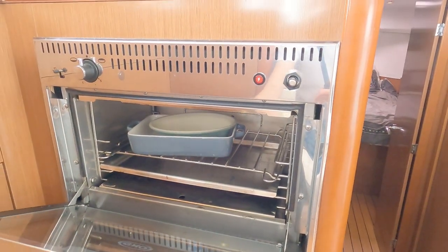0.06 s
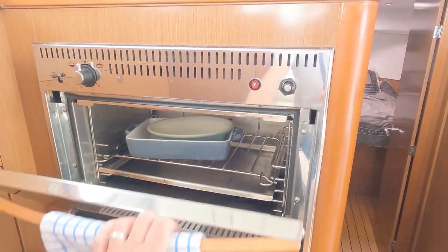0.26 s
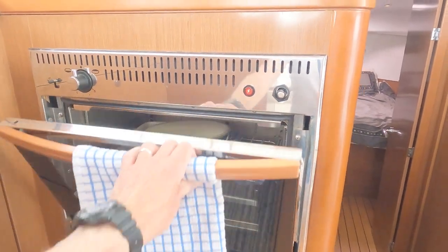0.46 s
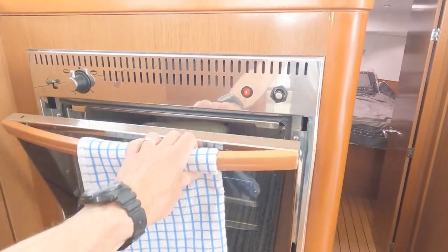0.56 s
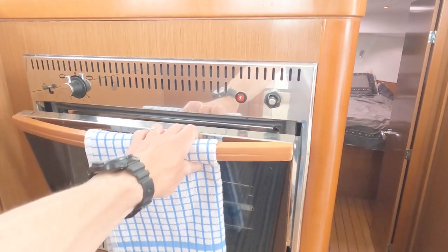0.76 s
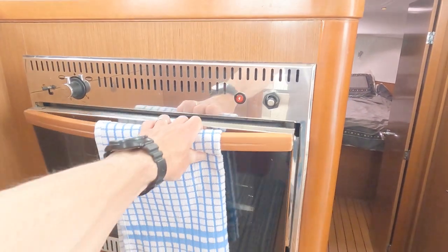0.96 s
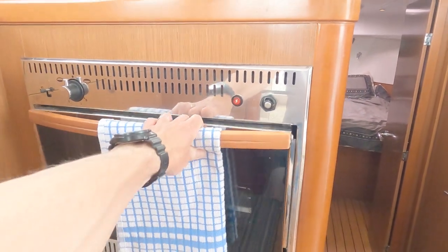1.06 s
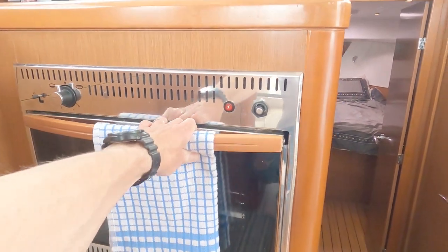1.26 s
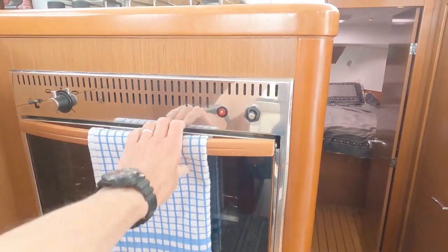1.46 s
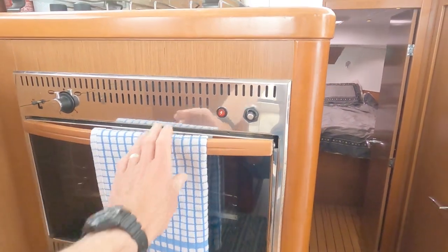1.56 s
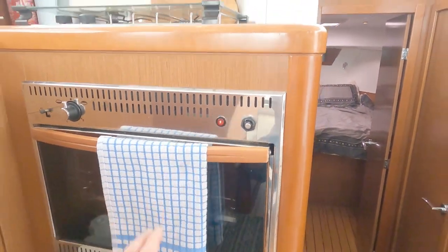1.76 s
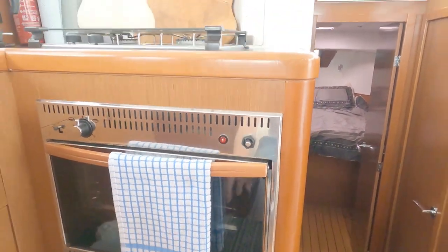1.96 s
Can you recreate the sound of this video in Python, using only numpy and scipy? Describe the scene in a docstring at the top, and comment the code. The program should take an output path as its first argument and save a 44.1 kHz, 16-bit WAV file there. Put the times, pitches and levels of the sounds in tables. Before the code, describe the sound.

In a boat galley with a low rumble, a steel oven door is closed close to the microphone. The hinges rasp, the door hits with a hollow clack, the seal rubs, and the latch clicks amid a faint cloth rustle.

```python
"""A small wooden boat galley: a steel oven door is swung shut by hand over a low cabin rumble.
The hinge arms scrape in dense tiny slips. The door knocks against the frame, its panel rings and
the oven box booms; then it is pressed home with small knocks and a rub of the seal.
The latch clicks as the hand lets go, and a towel on the handle rustles."""
import sys
import numpy as np
from scipy import signal
from scipy.fft import rfft, irfft
from scipy.io import wavfile
from scipy.ndimage import uniform_filter1d

SR = 44100
rng = np.random.default_rng(int(sys.argv[2]) if len(sys.argv) > 2 else 0)


def to_wav(sig):
    """Store sig (one row per channel, or 1-D mono) as 16-bit WAV at the path in sys.argv[1].

    Samples outside -1..1 are clipped; the rate is SR.
    """
    pcm = np.clip(np.atleast_2d(sig), -1, 1) * 32767
    pcm = np.round(pcm).astype(np.int16)
    wavfile.write(sys.argv[1], SR, pcm.T)  # frames by channels


N = 88200
TIME_S = np.arange(N) / SR

# Galley reverberation. Each row: frequency in Hz, T60 in seconds.
GALLEY_T60 = [(100, 0.49), (500, .18), (1500, 0.2), (4000, 0.17)]
# Stereo width. Each row: frequency in Hz, side gain in dB.
SIDE_EQ = [(30, -2.5), (100, -20), (300, -12.5), (1000, -9), (2500, -6), (8000, -9.5), (12000, -4)]
# Stereo balance. Each row: frequency in Hz, left minus right in dB.
BALANCE = [(200, 0.27), (1000, 0.66), (4000, 2)]

# Cabin background spectrum. Each row: frequency in Hz, gain in dB.
CABIN_EQ = [(15, -8.5), (30, -9.5), (50, -4), (80, -25), (180, -19.5), (400, -35.5), (800, -36),
            (1200, -34.5), (3000, -51.5), (7000, -79), (12500, -66.5)]
# Cabinet rumble under the hand. Each row: time in seconds, level in dB.
CABINET_ENV = [(.05, -54.5), (.2, -49.5), (.31, -51), (.45, -45.5), (.6, -45), (.85, -48.5), (.95, -58.5),
               (1.0, -69), (1.14, -44.5), (1.2, -71), (1.25, -50), (1.5, -53.5), (1.6, -76), (1.72, -55.5),
               (1.8, -52), (2, -58.5)]
# Its spectrum. Each row: frequency in Hz, gain in dB.
CABINET_EQ = [(25, -6), (50, 0), (88, 4), (130, -3.5), (200, -4.5), (350, -14), (600, -14), (1200, -28),
              (4000, -83)]

# Hand and towel on the handle. Each row: time in seconds, level in dB.
TOWEL_ENV = [(.62, -70), (.67, -56), (.76, -67), (.86, -64), (1.2, -82), (1.31, -69), (1.42, -68.5),
             (1.438, -53), (1.462, -43), (1.475, -54), (1.53, -69), (1.59, -77), (1.72, -73), (1.84, -67.5),
             (1.95, -62.5), (2, -66)]
# Their spectrum. Each row: frequency in Hz, gain in dB.
TOWEL_EQ = [(150, -4), (400, 4), (800, -17.5), (1400, 5.5), (2800, 1), (4500, -2.5), (7500, -4.5),
            (9000, -14), (12500, -23)]
# Seal rub. Each row: time in seconds, level in dB.
SEAL_ENV = [(.58, -45.5), (.66, -50), (.73, -42), (.82, -49), (.93, -52.5), (1.06, -47.5), (1.12, -55.5),
            (1.19, -60.5), (1.28, -60.5), (1.4, -72.5), (1.55, -62.5), (1.65, -68)]
# Its spectrum. Each row: frequency in Hz, gain in dB.
SEAL_EQ = [(60, -9), (200, -4.5), (480, 5.5), (800, -3), (1200, -2.5), (2200, -14), (4500, -18.5),
           (7500, -28.5), (9000, -35.5), (12500, -44.5)]

# Hinge scrape. Each row: time in seconds, level in dB.
SCRAPE_ENV = [(0, -75), (.05, -63), (.1, -48.5), (.22, -44), (.3, -38), (.37, -37), (.44, -39),
              (.51, -41.5), (.56, -41), (.62, -55)]
# Its spectrum. Each row: frequency in Hz, gain in dB.
SCRAPE_EQ = [(60, -4), (130, 1), (200, -5.5), (310, 1.5), (380, -1), (470, 8), (590, 3), (800, -4),
             (1050, 2), (1900, -3.5), (4000, -7), (5200, -11), (7500, -17), (8500, -24.5), (12500, -35.5)]
# Thin hinge rasp. Each row: time in seconds, level in dB.
RASP_ENV = [(.03, -96), (.1, -66), (.18, -49.5), (.25, -52.5), (.4, -52.5), (.5, -56)]
# Its spectrum. Each row: frequency in Hz, gain in dB.
RASP_EQ = [(500, -22), (2500, -16), (3500, -3), (3950, 3), (4500, -0.5), (5300, -13), (12000, -33)]
# Hinge spring zip. Each row: time in seconds, level in dB.
SPRING_ENV = [(.455, -59), (.476, -44.5), (.505, -72)]
# Its spectrum. Each row: frequency in Hz, gain in dB.
SPRING_EQ = [(2000, -28), (4900, -6), (5800, 0), (8000, -33)]
# Hinge arm ring. Each row: frequency in Hz, gain in dB, T60 in seconds.
ARM_MODES = [(2270, -3, 0.38), (3030, -5, .25), (3630, 7, .25), (3900, 2, .2)]

# Metal clatter spectrum. Each row: frequency in Hz, gain in dB.
CLATTER_EQ = [(250, -1.5), (680, -6.5), (1800, 0)]
# Latch clicks. Each row: start in seconds, gain in dB, rise in seconds.
LATCH_CLICKS = [(1.3816, -16, 0.00079), (1.4349, -12.5, 0.0015), (1.4440, -4, 0.001), (1.454, -1.5, 0.0024),
                (1.4808, 0, 0.00041), (1.4850, -10.5, 0.00065)]
# Their spectrum. Each row: frequency in Hz, gain in dB.
LATCH_EQ = [(60, -26), (220, -6), (370, -9.5), (520, -9), (820, -14), (1200, 0), (1650, -5.5), (2200, -10),
            (2900, -10), (4500, -21.5), (7500, -24), (9000, -35.5), (13000, -44)]
# Latch ring. Each row: frequency in Hz, gain in dB, T60 in seconds.
LATCH_MODES = [(366.6, 12, 0.177), (1043, 5.5, .14), (1250, 0, 0.075), (1570, 5, 0.14), (2690, -4, .13),
               (3005, 0.5, 0.2)]

# Door blows on the frame. Each row: start in seconds, boom, body, clack and tick gains in dB,
# rise in seconds, knock pitch in Hz, knock level in dB.
DOOR_BLOWS = [(0.4687, -38, -10.5, -6, -17, .003, 573, -26.5), (.516, 8, -5.5, -2, -4, .002, 920, -49),
              (0.5286, -25, -5, 8, 1.5, .0007, 997, -27.5), (0.5346, 6.5, 9, 2.5, -4.5, .0005, 532, -19),
              (.572, -0.5, -16, -11, -31, .002, 417, -37), (1.07, -14.5, -8.5, -15.5, -23, .0035, 507, -34),
              (1.11, -13.5, -31, -32, -16, .0005, 97, -38.5),
              (1.23, -34, -20, -18, -38.5, 0.0017, 1124, -45),
              (1.237, -26, -11.5, -37, -33, .005, 322, -42.5),
              (1.769, -31, -23.5, -42, -31.5, .001, 200, -52),
              (1.791, -18.5, -20, -38, -29, .001, 245, -42)]
# Their common spectrum. Each row: frequency in Hz, gain in dB.
BLOW_EQ = [(40, -13), (150, -4), (290, 0.5), (480, 8.5), (780, 0.5), (1000, 2.5), (1400, 1.5), (2300, -3),
           (3700, -4.5), (5500, -11), (7600, -17), (9000, -24.5), (13000, -33.5)]
# Door panel ring. Each row: frequency in Hz, gain in dB, T60 in seconds.
PANEL_MODES = [(231.8, 6, 0.2), (286.5, -7, 0.41), (428.2, -0.5, 0.15), (480.6, -9.5, 0.24),
               (714.4, 10, 0.072), (924, 4.5, 0.08), (1023, 11, 0.12), (1120, -4.5, 0.2),
               (1460, -11.5, 0.16), (1577, 5, 0.093), (1880, 0, 0.12), (3700, -2, 0.084)]
# Oven box boom. Each row: frequency in Hz, gain in dB, T60 in seconds.
BOX_MODES = [(53, 1, 0.13), (62.4, -21, 0.92), (78.44, -2, 0.86), (93, -9.5, 0.62), (127.9, -2, 0.61),
             (158.7, -19, 0.76)]


def amp(db):
    """dB to linear gain."""
    return 10 ** (np.asarray(db) / 20)


def unit(x):
    """Scale to RMS 1."""
    return x / np.sqrt(np.mean(x ** 2) + 1e-20)


def at_hz(table, hz):
    """Interpolate over log frequency."""
    row_hz, value = np.transpose(table)
    return np.interp(np.log(hz + 1), np.log(row_hz + 1), value)


def add(mix, start_s, sound):
    """Mix in place from start_s."""
    part = mix[:, max(round(start_s * SR), 0):][:, :sound.shape[1]]
    part += sound[:, :part.shape[1]]


def eq(x, curve, size=4096):
    """Minimum-phase filter from (Hz, dB) points."""
    log_gain = np.log(amp(at_hz(curve, abs(np.fft.fftfreq(size, 1 / SR)))))
    taps = np.fft.ifft(np.exp(np.conj(signal.hilbert(log_gain)))).real[:size // 2]
    taps = taps.reshape((1,) * (x.ndim - 1) + (-1,))
    return signal.fftconvolve(x, taps, axes=-1)[..., :x.shape[-1]]


def flat_noise(size):
    """Mid and side noise, flat spectrum."""
    return unit(irfft(np.exp(2j * np.pi * rng.random((2, size // 2 + 1))), size))


def ring(modes, t):
    """Decaying sines of alternating sign."""
    return sum((-1) ** k * amp(db) * np.exp(-np.log(1000) * t / t60_s) * np.sin(2 * np.pi * hz * t)
               for k, (hz, db, t60_s) in enumerate(modes))


def galley_tail(size=32768):
    """Diffuse mid and side reverb, each band decaying at its own rate."""
    hz, t, bands = signal.stft(flat_noise(size), SR, nperseg=256)
    decay = amp(-60 * t / at_hz(GALLEY_T60, hz)[:, None])
    tail = signal.istft(bands * decay, SR, nperseg=256)[1][:, :size]
    return unit(tail) / np.sqrt(size)


def cabin(air_db=-52, hum_db=-47.5, hum_hz=30.8):
    """Low noise and a deep hum wavering in level and phase."""
    knots = rng.standard_normal(16) + 1j * rng.standard_normal(16)
    waver = 0.4 * unit(signal.resample(knots, N).real)
    air = amp(air_db) * unit(eq(flat_noise(N), CABIN_EQ))
    phase = 2 * np.pi * (hum_hz * TIME_S + rng.random()) + waver[::-1]
    air[0] += amp(hum_db) * np.sqrt(2) * (1 + waver) * np.sin(phase)
    return air * np.minimum(TIME_S / .03, 1)


def cabinet():
    """The cabinet rumbles under the hand's changing push."""
    return unit(eq(flat_noise(N), CABINET_EQ)) * amp(np.interp(TIME_S, *np.transpose(CABINET_ENV)))


def friction(envelope, curve, slips_per_s=5000, spread_db=2.5, wet_db=2.5, dwell_s=.03, places=5):
    """Dense tiny slips; their reflections shift as door and hand move."""
    onsets = rng.random(N) < slips_per_s / SR
    strength = amp(spread_db * np.minimum(rng.exponential(1, N), 3.6))
    slips = onsets * strength * rng.standard_normal((2, N))
    place = (TIME_S // dwell_s).astype(int) % places
    echoes = sum(signal.fftconvolve(slips * (place == k), galley_tail(8192), axes=1)[:, :N]
                 for k in range(places))
    level_db = np.interp(TIME_S, *np.transpose(envelope), left=-120, right=-120)
    return unit(eq(slips + amp(wet_db) * echoes, curve)) * amp(level_db)


def towel():
    """Hand and towel slide on the handle."""
    return friction(TOWEL_ENV, TOWEL_EQ)


def seal():
    """The seal rubs as the door is pressed home."""
    return friction(SEAL_ENV, SEAL_EQ)


def hinge(ring_db=-19):
    """The arms rasp and ring faintly, fuller as the door gains speed; the spring zips last."""
    scrape = friction(SCRAPE_ENV, SCRAPE_EQ) + friction(RASP_ENV, RASP_EQ)
    ringing = signal.fftconvolve(scrape, ring(ARM_MODES, TIME_S)[None], axes=1)[:, :N]
    return scrape + amp(ring_db) * scrape.std() * unit(ringing) + friction(SPRING_ENV, SPRING_EQ)


def contact(rise_s, modes, ring_db, tail_db, clatter_db=4.5, decay_s=.0055, snap_db=-26, size=32768):
    """Metal impact: snap, brief clatter, the part's ring, room tail. A soft contact swells."""
    t = np.arange(size) / SR
    burst = amp(clatter_db) * unit(flat_noise(size) * np.exp(-t / decay_s)) / np.sqrt(size)
    spectrum = rfft(burst + amp(tail_db) * galley_tail())
    power = uniform_filter1d(abs(spectrum) ** 2, size=200, axis=1)
    clatter = irfft(spectrum * np.sqrt(power.mean() / (abs(power) + 1e-12)), size)  # whitened
    ringing = amp(ring_db) * np.array([ring(modes, t), ring(modes[::-1], t) / 2])
    hit = (eq(clatter, CLATTER_EQ) + ringing) * np.minimum(t / rise_s, 1)
    hit[0, int(rise_s * SR)] += amp(snap_db)
    return hit * np.clip(2 - 2 * t / t[-1], 0, 1) ** 2


def latch():
    """The catch slips into place in a quick run of clicks."""
    clicks = np.zeros((2, N))
    for start_s, db, rise_s in LATCH_CLICKS:
        add(clicks, start_s, amp(db) * contact(rise_s, LATCH_MODES, ring_db=-43, tail_db=-1.5))
    return eq(clicks, LATCH_EQ)


def oven_box(t, gain_db, rise_s=.024):
    """The struck box swells into a low boom."""
    return amp(gain_db - 33) * (1 - np.exp(-t / rise_s)) * ring(BOX_MODES, t)


def blow(boom_db, body_db, clack_db, tick_db, rise_s, knock_hz, knock_db):
    """Panel clack and a damped knock pitched by the spot struck, over the box boom."""
    hit = contact(rise_s, PANEL_MODES, ring_db=-41, tail_db=-2)
    hit = eq(eq(hit, BLOW_EQ), [(390, body_db), (1430, clack_db), (4950, tick_db)])
    t = np.arange(hit.shape[1]) / SR
    peak_s = .0019 + rise_s / 2
    swell = (t / peak_s) ** 2 * np.exp(2 - 2 * t / peak_s)
    knock = amp(knock_db) * swell * np.sin(2 * np.pi * knock_hz * t)
    hit[0] += knock + oven_box(t, boom_db)
    return hit


def door():
    """The door strikes the frame, then knocks lightly as it is pressed home."""
    blows = np.zeros((2, N))
    for start_s, *settings in DOOR_BLOWS:
        add(blows, start_s, blow(*settings))
    return blows


def scene():
    """Mid/side sum to narrow stereo, treble slightly left."""
    mid, side = door() + latch() + cabinet() + hinge() + seal() + towel() + cabin()
    side = eq(side, SIDE_EQ)
    left = eq(mid + side, [(hz, db / 2) for hz, db in BALANCE])
    right = eq(mid - side, [(hz, -db / 2) for hz, db in BALANCE])
    return np.array([left, right])


def record(dry):
    """Linear-phase low-pass."""
    cutoff_hz = 13600
    taps = signal.firwin(101, cutoff_hz, window=("kaiser", 8), fs=SR)
    return signal.oaconvolve(dry, taps[None], "same")


dry = scene()
out = record(dry)
to_wav(out)
```